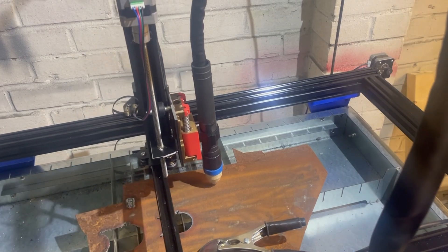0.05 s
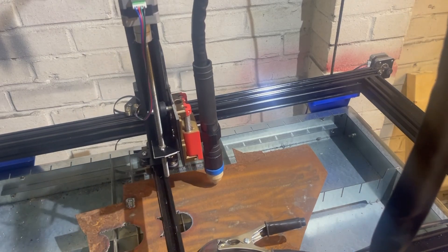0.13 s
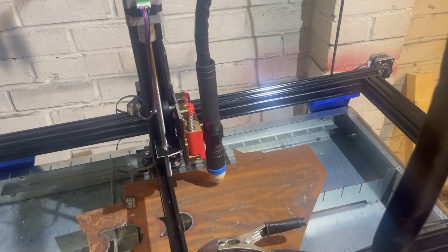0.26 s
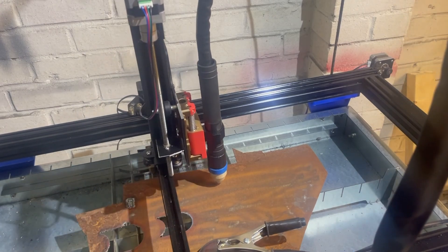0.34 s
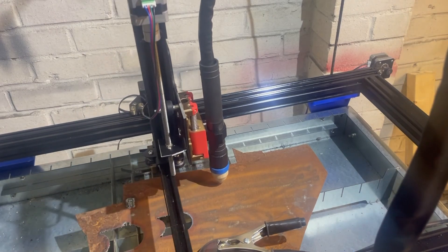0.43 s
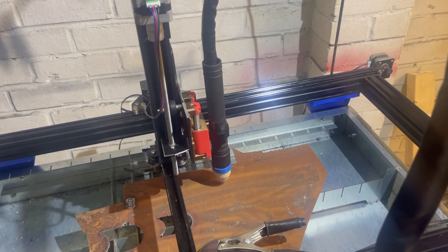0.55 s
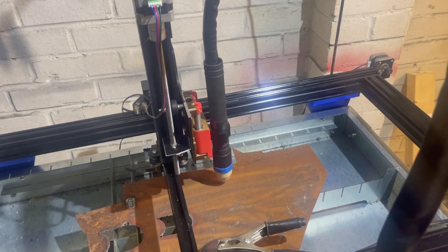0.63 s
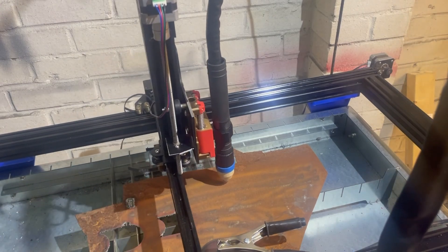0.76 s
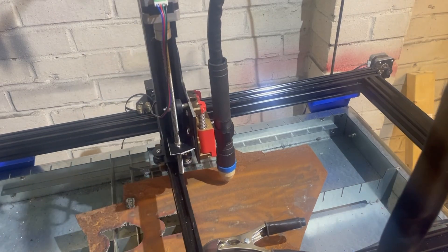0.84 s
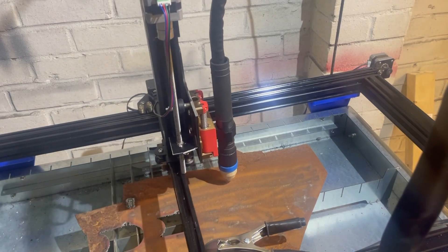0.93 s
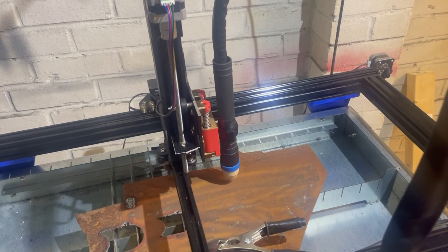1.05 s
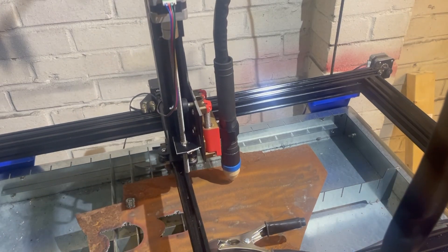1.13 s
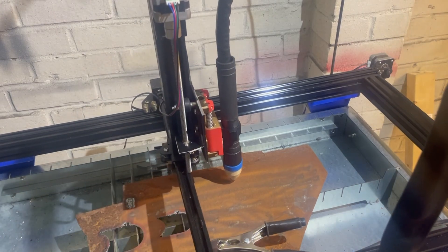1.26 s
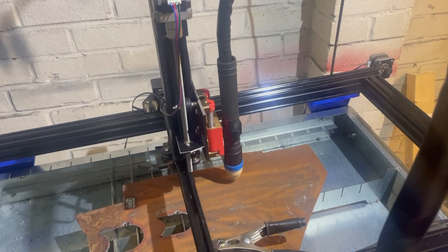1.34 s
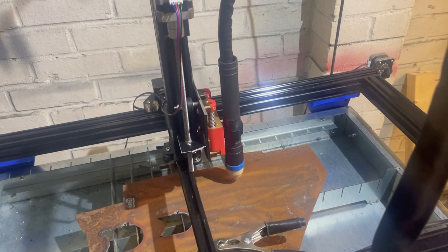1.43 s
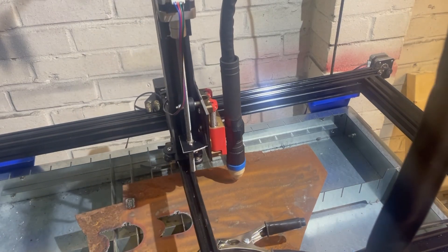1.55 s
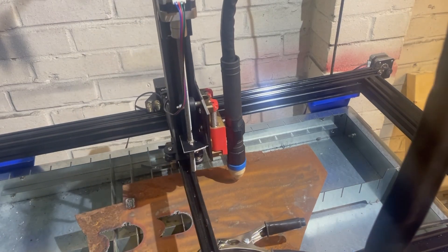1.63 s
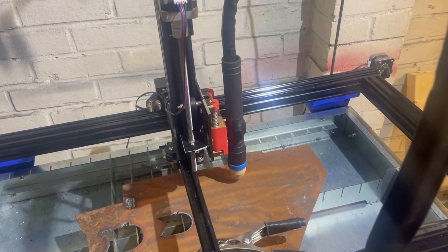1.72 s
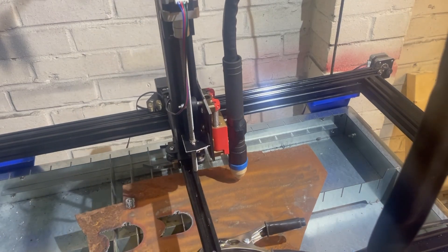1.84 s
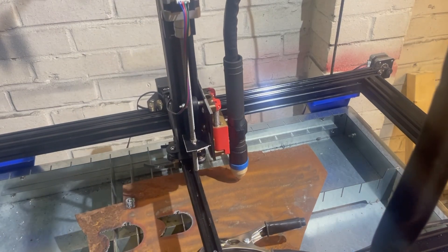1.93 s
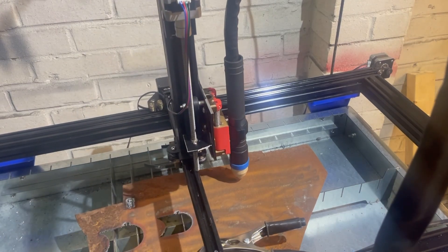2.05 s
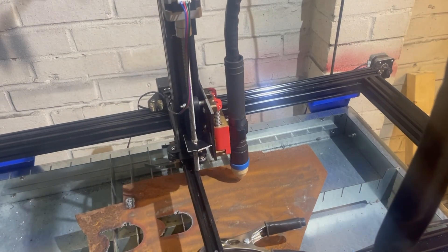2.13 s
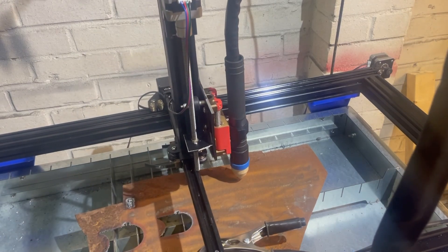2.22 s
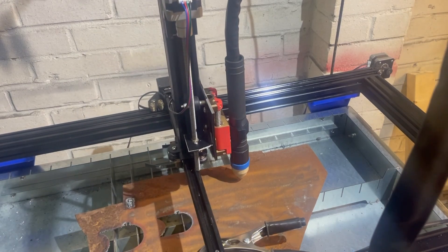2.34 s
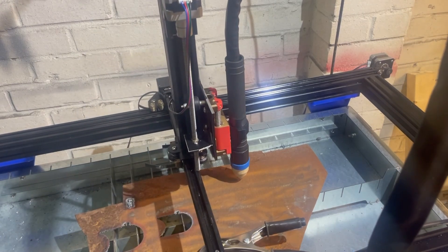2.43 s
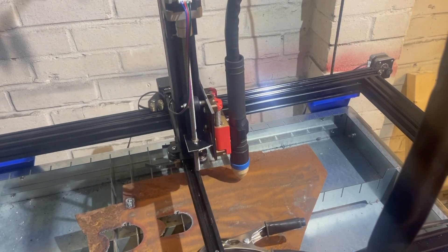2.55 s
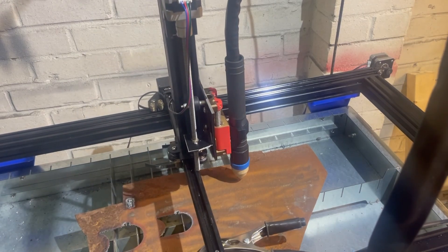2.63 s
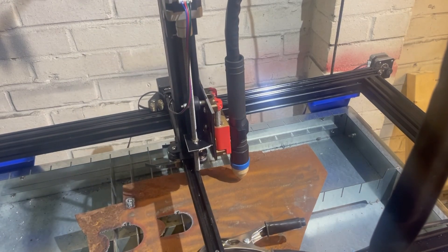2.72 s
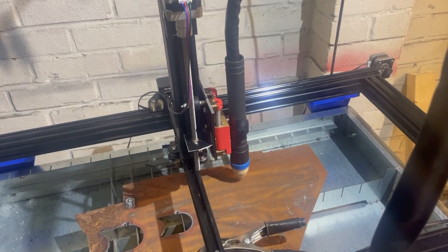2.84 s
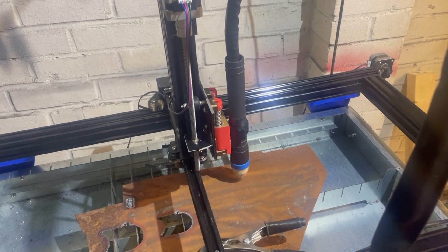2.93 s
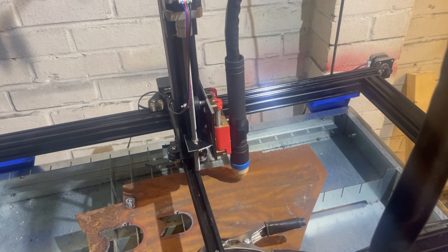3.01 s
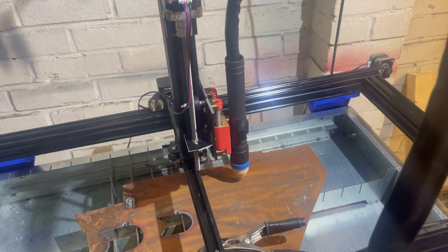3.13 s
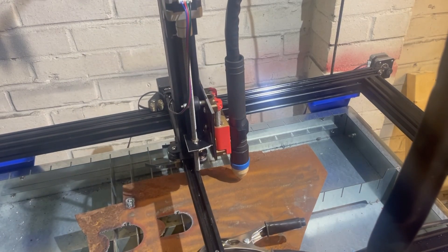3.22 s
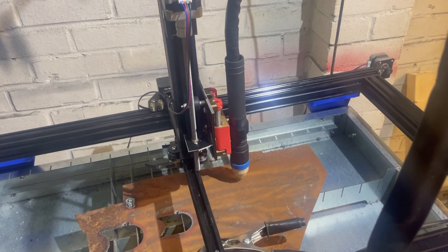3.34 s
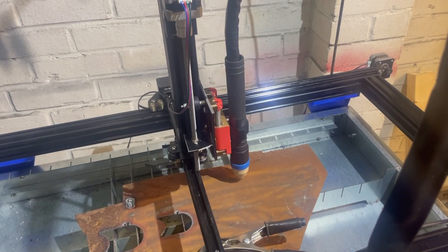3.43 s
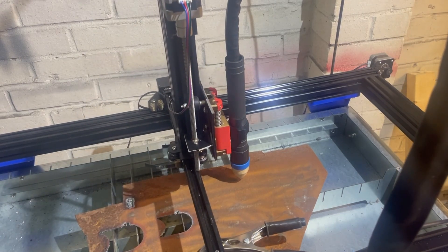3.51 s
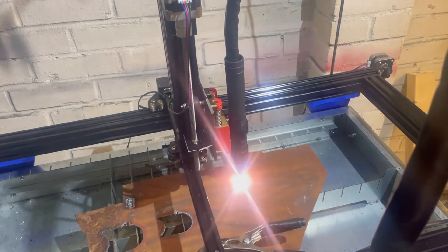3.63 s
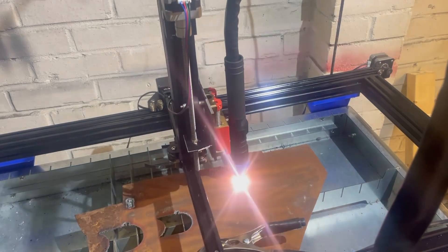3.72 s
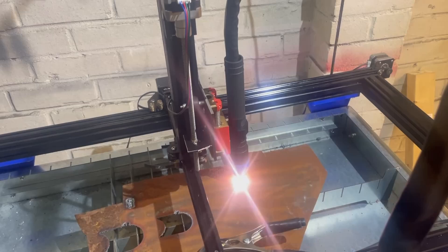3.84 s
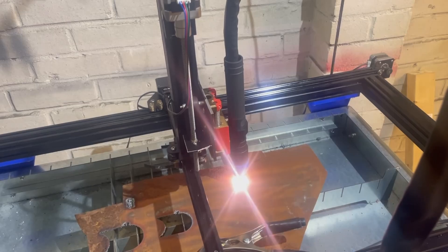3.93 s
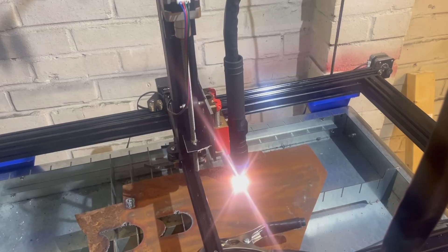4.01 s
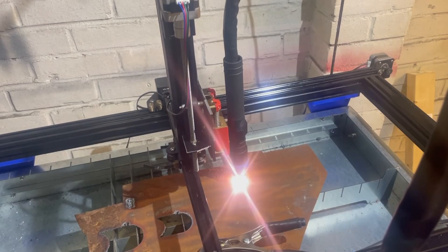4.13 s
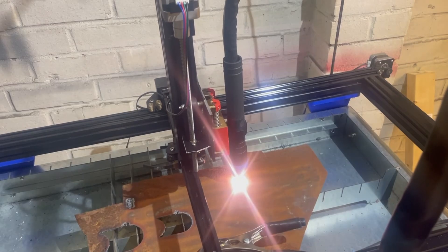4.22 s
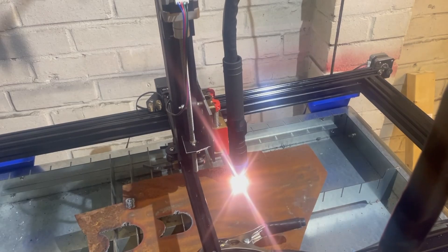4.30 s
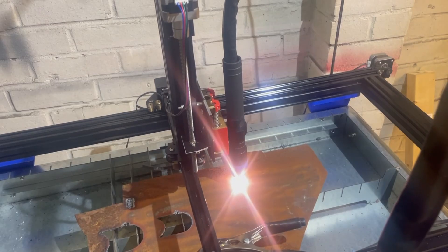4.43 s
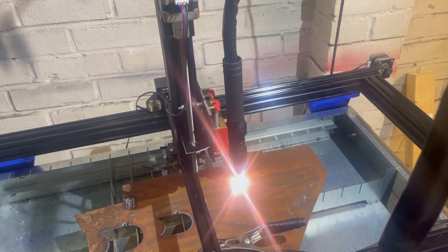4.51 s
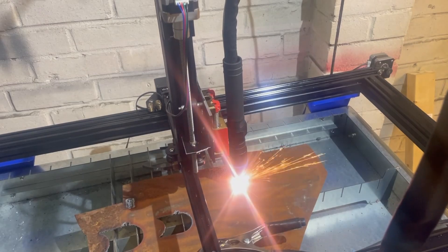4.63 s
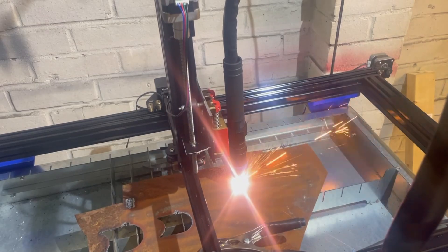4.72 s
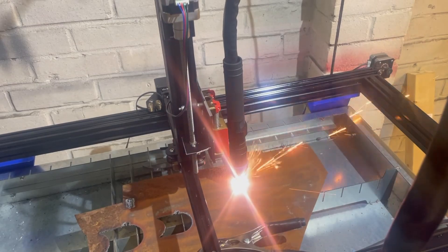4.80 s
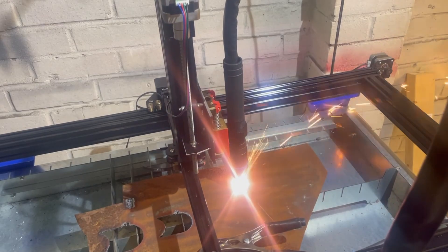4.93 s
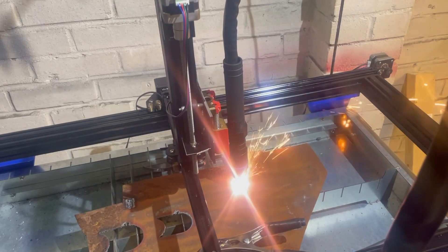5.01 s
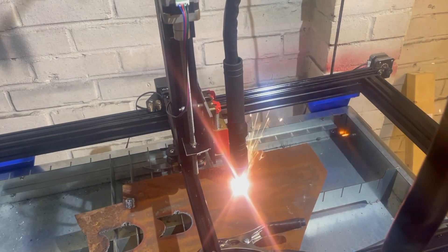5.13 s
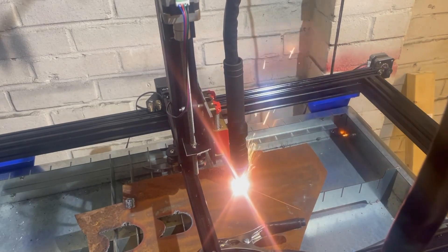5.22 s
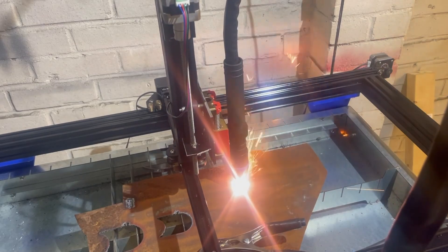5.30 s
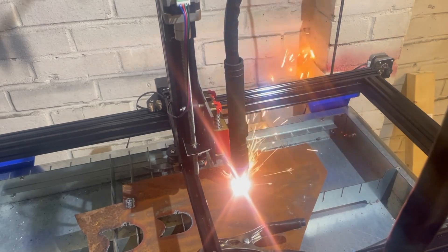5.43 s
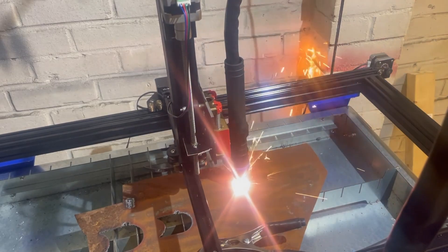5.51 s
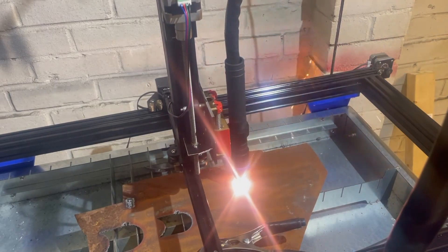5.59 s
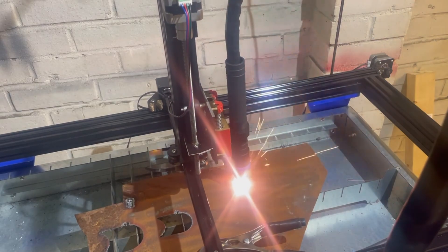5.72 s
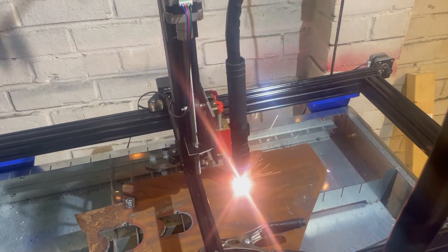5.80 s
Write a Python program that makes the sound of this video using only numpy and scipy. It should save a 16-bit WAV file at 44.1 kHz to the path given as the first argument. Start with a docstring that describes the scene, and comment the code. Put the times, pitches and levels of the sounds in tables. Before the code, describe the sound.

From 0 to 1.1 s a torch blows a steady, bright, wide stereo hiss of air, which then bleeds off unevenly within about a quarter second. What remains is quiet: a wavering mid-low fan tone, low hum, soft draught and a very faint high hiss. From 1.2 to 2.4 s a thin motor whine glides steadily down, swelling at resonances, and stops. The fan continues alone, slightly stronger. At 3.5 s two soft valve ticks and a puff of air lead instantly to the arc lighting: an abrupt, loud, full hiss and roar with a faint metallic ring. Deep, sharp pops with little noisy spits start at 3.7 s, crowd together from 3.8 to 4.4 s, while the roar drops somewhat after 4.1 s. They continue irregularly to 4.85 s, grow sparse and weaker, then strong pops return around 5.65 to 5.8 s over swelling hiss, still burning at the end. Short brick-room reflections.

```python
"""Air hisses in stereo from a plasma torch on a cutting table in a brick workshop, then shuts off.
A drive motor whines down over fan hum. The valve ticks, air returns and the arc lights with a loud hiss,
then sputters in deep pops as it pierces the steel. Both jets are shaped stereo noise, pops are falling
sweeps with spits of noise, the motor and fan are wavering sines, the draught is noise."""
import sys
import numpy as np
from scipy import signal
from scipy.fft import rfft, irfft, next_fast_len
from scipy.io import wavfile
from scipy.ndimage import uniform_filter1d, map_coordinates

SR = 44100
rng = np.random.default_rng(int(sys.argv[2]) if len(sys.argv) > 2 else 0)


def unload_wav(signal):
    """Save mono or channel-first audio to the path in sys.argv[1] as 16-bit WAV at rate SR, clipped to [-1, 1]."""
    wavfile.write(
        sys.argv[1],
        SR,
        np.round(np.clip(np.atleast_2d(signal).T, -1, 1) * 32767).astype(np.int16),
    )


N = 258426

STRIKE_S = 3.5395
BURN_HISS_DB, BURN_RUSH_DB = -30.5, -35.5  # before the swells, settling and sinking
# a new flame starts with weak hiss and strong rush; each offset decays with its time constant
SETTLE_HISS_DB, SETTLE_HISS_TAU_S = -3.5, 0.039
SETTLE_RUSH_DB, SETTLE_RUSH_TAU_S = 2, 0.093
# the jet sinks into the pit that it melts: hiss and rush drop, each over its own time
SINK_S = 4.12
SINK_HISS_DB, SINK_HISS_S = -5, 0.26
SINK_RUSH_DB, SINK_RUSH_S = -5.5, 0.13
# Burning jet swelling and easing, most as sparks flare up.
# Each row: time in seconds, hiss offset in dB, rush offset in dB.
ARC_SWELLS = [(3.56, 1.4, -0.4), (3.61, 2, 0.6), (3.72, -0.4, -1.1), (3.9, 1, -0.5), (4.15, 0.2, 0),
              (4.27, -0.5, 1), (4.4, 1, 0.6), (4.66, 1.3, 0), (4.8, 1.5, 0), (5.0, 0.5, -1.7),
              (5.25, 1, -0.1), (5.38, 0.5, 0), (5.51, 2.9, 1), (5.7, 2.5, 2), (5.85, 1.5, 2)]
# Spectrum of the burning jet's roar. Each row: frequency in Hz, density in dB per Hz (relative).
ARC_ROAR_COLOUR = [(25, -19), (60, -5), (170, -7.5), (450, -9.5), (750, -11), (1100, -9), (1500, -7.5),
                   (2200, -6), (3000, -5.5), (4300, -6.5)]
# Its treble, continuing the roar. Each row: frequency in Hz, density in dB per Hz (relative).
ARC_TREBLE_COLOUR = [(5700, -2.6), (6400, -4), (7400, -1.9), (8600, 0.4), (10700, 0.1), (12400, -1.5),
                     (13300, -3.6), (14200, -0.6), (15700, -3.5), (16500, -40)]
# Narrow steel plate modes, kept ringing by the burning jet.
# Each row: frequency in Hz, width in Hz, lift in dB.
PLATE_MODES = [(1098, 14, 4), (2367, 30, 4.5), (2567, 32, 2.5), (3140, 45, 3), (3348, 38, 2.5),
               (3900, 38, 3.5), (4128, 20, 3), (5254, 24, 3), (5566, 24, 2.5), (10745, 30, 3)]


def arc():
    """The arc lights at once with a brief overshoot; its roar eases as it sinks into the plate."""
    age_s = np.maximum(clock() - STRIKE_S, 0)
    attack = 1 - np.exp(-age_s / 0.00055)
    overshoot = 1 + 0.35 * np.exp(-age_s / 0.0053)
    times_s, *offsets_db = np.transpose(ARC_SWELLS)
    hiss_db, rush_db = [np.interp(clock(), times_s, offset) for offset in offsets_db]
    hiss_db = hiss_db + SETTLE_HISS_DB * np.exp(-age_s / SETTLE_HISS_TAU_S)
    hiss_db = hiss_db + SINK_HISS_DB * ramp(SINK_S, SINK_HISS_S)
    rush_db = rush_db + SETTLE_RUSH_DB * np.exp(-age_s / SETTLE_RUSH_TAU_S)
    rush_db = rush_db + SINK_RUSH_DB * ramp(SINK_S, SINK_RUSH_S)
    flame = jet(BURN_HISS_DB + hiss_db, BURN_RUSH_DB + rush_db, ARC_ROAR_COLOUR + ARC_TREBLE_COLOUR,
                PLATE_MODES, split_hz=5600, flutter_db=0.5, wet_db=-10)
    return attack * overshoot * flame


POP_GAIN_DB, POP_RISE_SHARE = -2, 0.12  # rise time constant as a share of pop length
# Sputtering pops.
# Each row: start in seconds, jolt peak in dB before POP_GAIN_DB and the tray, nominal length in seconds.
POP_EVENTS = [(3.7145, -23.5, 0.018), (3.7222, -22.5, 0.042), (3.738, -30.5, 0.039), (3.784, -39, 0.013),
              (3.8295, -19, 0.024), (3.8608, -19, 0.023), (3.873, -26.5, 0.023), (3.9091, -18.5, 0.017),
              (3.9229, -21, 0.021), (3.9279, -26.5, 0.016), (3.9336, -17.5, 0.022), (3.9594, -26.5, 0.014),
              (3.9694, -28, 0.025), (3.976, -24.5, 0.038), (4.0136, -18, 0.026), (4.0327, -21, .018),
              (4.037, -15.5, 0.018), (4.0431, -25.5, 0.025), (4.0492, -24, 0.016), (4.0615, -23, 0.027),
              (4.0914, -22.5, 0.016), (4.097, -28, 0.019), (4.1512, -27.5, 0.019), (4.1601, -21, 0.026),
              (4.1646, -27, 0.019), (4.18, -27.5, 0.025), (4.2154, -21.5, 0.017), (4.2293, -24, 0.026),
              (4.2571, -32, 0.027), (4.2855, -26, 0.016), (4.327, -28.5, 0.03), (4.3478, -23, 0.012),
              (4.3594, -30, 0.022), (4.3655, -30.5, 0.018), (4.3898, -33, 0.026), (4.5404, -25, 0.025),
              (4.5834, -28, 0.025), (4.622, -24, 0.019), (4.6263, -26.5, 0.033), (4.6442, -30.5, 0.03),
              (4.701, -29.5, 0.012), (4.7671, -25.5, 0.021), (4.8125, -30, 0.014), (4.8209, -26.5, 0.028),
              (4.8401, -28.5, 0.031), (4.8497, -27.5, 0.025), (4.99, -37.5, 0.026), (5.162, -45, 0.019),
              (5.224, -34, 0.025), (5.2537, -29.5, 0.023), (5.358, -35.5, 0.041), (5.4525, -32.5, 0.017),
              (5.52, -36, 0.022), (5.6397, -34.5, .024), (5.6567, -26, 0.029), (5.6714, -30, 0.014),
              (5.685, -20.5, 0.024), (5.7018, -34, 0.028), (5.7136, -32.5, 0.024), (5.7658, -29, 0.035),
              (5.7828, -18, 0.024), (5.8152, -29.5, 0.031)]
# Table tray's colouring of the pops. Each row: frequency in Hz, gain in dB.
TRAY_GAIN = [(30, -1.5), (65, 4.5), (130, 0), (480, 2), (1500, 3)]


def pops(start_hz, fall_s, faint_db, spit_db, spit_tau_s, count):
    """Pressure jolts, outward or inward, fall in pitch as 1 / time; each brings a short spit of noise."""
    t = np.arange(SR // 8) / SR
    jolts, spit_power = np.zeros(N + SR), np.zeros(N + SR)
    # once the steel has begun to melt, faint sputters fall among the big pops
    melt_s = POP_EVENTS[0][0]
    faint = [(melt_s + when * (N / SR - melt_s), faint_db + 8 * (size - .5), .018)
             for when, size in rng.random((count, 2))]
    for s, db, length_s in list(POP_EVENTS) + faint:
        # random spread of rise, length and pitch fall
        shape_s = np.array([POP_RISE_SHARE * length_s, length_s, fall_s])
        rise, life, fall = shape_s * np.exp(rng.normal(0, [.5, .06, .05]))
        sweep = np.sin(2 * np.pi * start_hz * fall * np.log(1 + t / fall))
        swell = (1 - np.exp(-t / rise)) * np.exp(-(t / life) ** 2)
        sign = rng.choice([-1, 1])
        span = slice(round(s * SR), round(s * SR) + len(t))
        jolts[span] += sign * amp(db + POP_GAIN_DB) * sweep * swell / swell.max()
        spit_power[span] += (amp(db + spit_db) * np.exp(-t / spit_tau_s)) ** 2
    spit = noise([(40, -18), (150, 6.5), (550, 1.0), (1100, -14.5), (2500, -9), (6000, -25)], TORCH_STEREO)
    dry_pops = jolts[:N] + np.sqrt(spit_power[:N]) * spit
    return filtered(dry_pops, lambda hz: stereo_image(hz) * amp(along(TRAY_GAIN, hz)[0]))


# the valve shuts and the hose bleeds empty; it fills again when the valve reopens
SHUT_S, BLEED_TAU_S, FILL_TAU_S = 1.112, 0.12, 0.027
BLEED_CURVE, SPLUTTER_DB = 1.58, 1  # pressure falls ever faster, and unevenly
AIR_HISS_DB, AIR_RUSH_DB = -47, -54  # at full pressure
HISS_POWER, RUSH_POWER = 1, 0.79  # amplitude grows as pressure to this power
# Cold jet spectrum. Each row: frequency in Hz, density in dB per Hz (relative).
AIR_JET_COLOUR = [(40, -42), (200, -15), (900, -13), (1500, -11.7), (2200, -9.8), (4200, -9.3), (5400, -6),
                  (6400, -5.5), (7500, -4), (8800, -0.5), (10500, -2.6), (12000, -4.2), (13200, -7),
                  (14300, -2), (15700, 0), (16500, -40)]


def air():
    """Air alone blows through the torch until the arc lights; hiss and rush follow hose pressure."""
    t = clock()
    open_s = np.maximum(t - VALVE_TICKS[0][0], 0)
    refill = (1 - np.exp(-open_s / FILL_TAU_S)) ** 2 * (t < STRIKE_S)
    bleed = np.exp(-(np.maximum(t - SHUT_S, 0) / BLEED_TAU_S) ** BLEED_CURVE)
    splutter = amp(SPLUTTER_DB * ramp(SHUT_S, BLEED_TAU_S) * wobble(35))
    pressure_db = 20 * np.log10(bleed * splutter + refill + 1e-6)
    return jet(AIR_HISS_DB + HISS_POWER * pressure_db, AIR_RUSH_DB + RUSH_POWER * pressure_db,
               AIR_JET_COLOUR, [], split_hz=6840, flutter_db=0.5, wet_db=-34)


HISS_WET_DB = -11.5  # steel close to the nozzle throws some hiss back


def jet(hiss_db, rush_db, colour, bands, split_hz, flutter_db, wet_db):
    """Turbulence at the nozzle: small eddies hiss, larger ones rush; both flutter."""
    def lift(hz):
        return amp(sum(db / (1 + (2 * (hz - centre) / width) ** 2) for centre, width, db in bands))
    flow = filtered(noise(colour, TORCH_STEREO), lambda hz: stereo_image(hz) * lift(hz))
    rush = filtered(flow, lambda hz: 1 / (1 + (hz / split_hz) ** 8))
    hiss = flow - rush
    hiss = amp(hiss_db) * unit(hiss + amp(HISS_WET_DB) * ring(hiss))
    # larger eddies radiate all round, so the walls comb their spectrum
    rush = rush + amp(wet_db) * room(rush)
    rush = amp(rush_db) * unit(uneven(rush, depth_db=1.8))
    return amp(flutter_db * wobble(45)) * (hiss + rush)


# Left-right spread applied to the torch sounds; above 7 kHz the two sides swing between opposite and equal
# phase. # Each row: frequency in Hz, likeness 0-1, left lead in radians, left-right balance in dB.
TORCH_STEREO = [(80, 0.98, -0.42, 0.1), (250, 0.96, -0.62, 1.1), (400, 0.93, -0.75, -1),
                (560, 0.85, -0.9, -5.5), (760, 0.55, -0.7, -7.5), (1050, 0.58, -0.05, -4.5),
                (1700, 0.6, -0.2, -0.3), (2300, 0.6, -0.55, -1.5), (4300, 0.5, -0.55, -2),
                (5100, 0.15, -1, -4.5), (6200, 0.15, -2.9, -3.5), (6750, 0.65, -3.14, -1),
                (7150, 0.98, -3.14, 0), (7600, 0.999, -3.14, 0), (8650, 0.992, -3.14, 0),
                (9200, 0.65, -2.4, 0), (10000, 0.65, -1.1, 0), (10600, 0.94, -0.1, 0), (11400, 0.985, 0, 0),
                (12200, 0.93, 0.15, 0), (12900, 0.6, 1.7, 0), (13500, 0.97, 3.08, 0),
                (14800, 0.992, 3.14, 0), (15500, 0.8, 3.55, 0)]


def stereo_image(hz):
    """Phase and balance of the torch between left and right, by frequency."""
    _, lead_rad, balance_db = along(TORCH_STEREO, hz)
    half = np.array([[.5], [-.5]])
    return amp(half * balance_db) * np.exp(1j * half * lead_rad)


# Air valve ticks; the first also starts the hose refill.
# Each row: time in seconds, starting level in dB, t60 in seconds.
VALVE_TICKS = [(3.4967, -50.5, 0.086), (3.516, -44, 0.05)]


def valve():
    """The air valve ticks softly just before the arc lights: decaying bursts of coloured noise."""
    t = clock()
    ticks = sum((t > s) * amp(db - 60 * np.abs(t - s) / t60_s) for s, db, t60_s in VALVE_TICKS)
    return ticks * noise([(100, -18), (600, 9.0), (1500, -4), (4000, -2), (12000, -19)], TORCH_STEREO)


BRAKE_S, STOP_S, DRIVE_HZ = 1.22, 2.4506, 1993.6  # pitch at the start of braking
# Motor tones. Each row: multiple of the drive frequency, peak level in dB before the gantry.
MOTOR_TONES = [(1, -71.5), (2, -78), (3, -82)]
# Gantry's passing on of the whine. Each row: frequency in Hz, gain in dB.
GANTRY_GAIN = [(150, -17), (310, 0), (560, 0), (750, -16), (1300, -19), (1450, -13), (1570, -9), (1660, -2),
               (1760, 1), (1900, -12), (2100, 2), (2350, -11), (2550, -13), (2800, -6), (2980, -11),
               (3350, -4), (3700, -3), (4500, -18)]


def drives():
    """Motor tones glide evenly down as the carriage brakes, swelling at each gantry resonance."""
    hz = DRIVE_HZ * (1 - ramp(BRAKE_S, STOP_S - BRAKE_S))
    phase = 2 * np.pi * np.cumsum(hz) / SR
    whine = 0
    for k, db in MOTOR_TONES:
        level = amp(db + along(GANTRY_GAIN, k * hz)[0] + 2 * wobble(26.5))
        whine = whine + level * np.sin(k * (phase + 0.3 * wobble(96)))
    fade_in, fade_out = ramp(BRAKE_S, .06), 1 - ramp(STOP_S - .1, .1)
    return fade_in * fade_out * whine


FAN_HZ = 567
# Fan tones. Each row: multiple of FAN_HZ, level in dB relative to the fan level.
FAN_TONES = [(1, -1), (2, -18), (3, -28.5), (4, -32)]
# Fan level, swelling as the carriage comes to rest. Each row: time in seconds, rms level in dB.
FAN_LEVEL_CURVE = [(0, -82), (0.3, -67.5), (1.05, -72), (1.5, -71), (1.75, -66.5), (2.1, -65), (2.9, -64.5),
                   (3.5, -63)]
# Other steady machine tones. Each row: frequency in Hz, mean rms level in dB.
HUM_TONES = [(52, -78.5), (328, -78), (649, -91), (1621.5, -78.5), (12247, -106)]
# Workshop air and fan draught. Each row: frequency in Hz, density in dB per Hz (relative).
DRAUGHT_COLOUR = [(25, -35), (54, 0.5), (110, -9), (210, -13), (270, -9.5), (330, -4.5), (400, 2),
                  (480, -5.5), (600, -5), (900, -12.5), (1800, -16), (3600, -21.5), (6000, -28),
                  (11000, -80)]
# Left-right likeness of draught and idle hiss. Each row: frequency in Hz, likeness 0-1.
DRAUGHT_LIKENESS = [(60, 0.97), (300, 0.59), (640, 0.025), (1400, 0.02), (7000, 0.056)]
# Faint hiss that stays while the air is off. Each row: frequency in Hz, density in dB per Hz (relative).
IDLE_HISS_COLOUR = [(5000, -5), (8400, -10), (9300, 5), (12150, 3), (12280, 14), (12450, 6), (13000, -4),
                    (13600, -25)]


def machine():
    """Fan tones and hum, sines of wavering level and phase, over the noise of the draught."""
    t = clock()
    turns = FAN_HZ * t + 0.074 * wobble(7) + 0.026 * wobble(30)
    fan = sum(amp(db + (.7 if k == 1 else 2.2) * wobble(9.5)) * np.sin(2 * np.pi * k * turns)
              for k, db in FAN_TONES)
    hum = sum(amp(db + 0.76 * wobble(4.53)) * np.sin(2 * np.pi * hz * t + 1.04 * wobble(14))
              for hz, db in HUM_TONES)
    fan_level_db = np.interp(t, *np.transpose(FAN_LEVEL_CURVE))
    balance = amp([[-1], [1]])  # left 1 dB down, right 1 dB up
    tones = np.sqrt(2) * (amp(fan_level_db) * fan + hum) * balance
    # air through the fan's housing sings one wandering note
    sing = amp(-73.0 + 5.6 * wobble(10)) * np.sin(2 * np.pi * (390 * t + 0.45 * wobble(25)))
    draught = amp(-65.5) * unit(uneven(noise(DRAUGHT_COLOUR, DRAUGHT_LIKENESS), depth_db=1.6))
    idle_hiss = amp(-93.5) * noise(IDLE_HISS_COLOUR, DRAUGHT_LIKENESS)
    return tones + sing + draught + idle_hiss


# Room decay. Each row: frequency in Hz, t60 in seconds.
ROOM_T60 = [(100, 0.13), (600, 0.27), (3000, 0.17), (12000, 0.062)]


def room(x):
    """Brick walls answer with a short tail: noise decaying at a rate set by frequency."""
    hz, t, z = signal.stft(rng.standard_normal((2, SR // 3)), SR, nperseg=256)
    decay = amp(-60 * t / along(ROOM_T60, hz)[0][:, None])
    tail = signal.istft(z * decay, SR, nperseg=256)[1]
    return signal.fftconvolve(x, tail / np.linalg.norm(tail[0]), axes=1)[:, :N]


def ring(x, t60_s=0.076):
    """Quick reflections from plate and tray ripple the spectrum, alike left and right."""
    t = np.arange(SR // 8) / SR
    tail = rng.standard_normal(len(t)) * amp(-60 * t / t60_s)
    return signal.fftconvolve(x, tail[None] / np.linalg.norm(tail), axes=1)[:, :N]


def uneven(x, depth_db):
    """Random gain over time and frequency makes the noise slightly uneven."""
    z = signal.stft(x, nperseg=512)[2]
    field = uniform_filter1d(rng.standard_normal(z.shape[1:]), size=3, axis=0)
    field = uniform_filter1d(field, size=12, axis=1)
    return signal.istft(z * amp(depth_db * unit(field)), nperseg=512)[1][:, :N]


def noise(colour, alike):
    """Stereo noise of rms 1 with a given spectrum and left-right likeness."""
    def blend(hz):
        turn = np.arccos(np.clip(along(alike, hz)[0], -1, 1)) / 2
        return amp(along(colour, hz)[0]) * [np.cos(turn), np.sin(turn)]
    mid, side = filtered(rng.standard_normal((2, N)), blend)
    return unit(np.array([mid + side, mid - side]))


def filtered(x, response):
    """x times a complex response of frequency."""
    size = next_fast_len(N + SR // 8, True)
    return irfft(rfft(x, size) * response(np.fft.rfftfreq(size, 1 / SR)), size)[..., :N]


def along(points, hz):
    """Each column of a frequency table, read on a log axis."""
    f, *cols = np.transpose(points)
    return [np.interp(np.log(hz + 1), np.log(f + 1), c) for c in cols]


def wobble(rate_hz):
    """A smooth random curve through rate_hz knots a second."""
    t = clock()
    coarse_s = t[::64]
    knots = rng.standard_normal(int(N * rate_hz / SR) + 4)
    return np.interp(t, coarse_s, map_coordinates(knots, [coarse_s * rate_hz]))


def ramp(start_s, length_s):
    """A steady rise from 0 to 1."""
    return np.clip((clock() - start_s) / length_s, 0, 1)


def clock():
    """Time of every sample in seconds."""
    return np.arange(N) / SR


def amp(db):
    """Decibels to gain."""
    return 10 ** (np.asarray(db) / 20)


def unit(x):
    """Scale to rms 1."""
    return x / np.sqrt(np.mean(x ** 2) + 1e-20)


def scene():
    """Torch, table and workshop together."""
    knocks = pops(start_hz=4248, fall_s=0.00028, faint_db=-48.5, spit_db=-15.5, spit_tau_s=0.011, count=12)
    knocks = knocks + valve()
    torch = air() + arc() + knocks + amp(-18.0) * room(knocks)
    return torch + machine() + drives()


LOW_HZ, TOP_HZ = 28, 15750


def record(dry):
    """The microphone sheds the deepest bass and keeps nothing above its band limit."""
    def band(hz):
        low_cut = hz ** 4 / (hz ** 4 + LOW_HZ ** 4)
        high_cut = np.clip((TOP_HZ - hz) / 200 + .5, 0, 1)
        return low_cut * high_cut
    return filtered(dry, band)


dry = scene()
out = record(dry)
unload_wav(out)
```